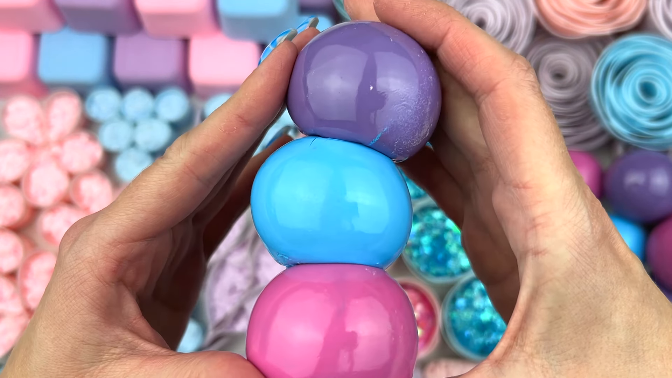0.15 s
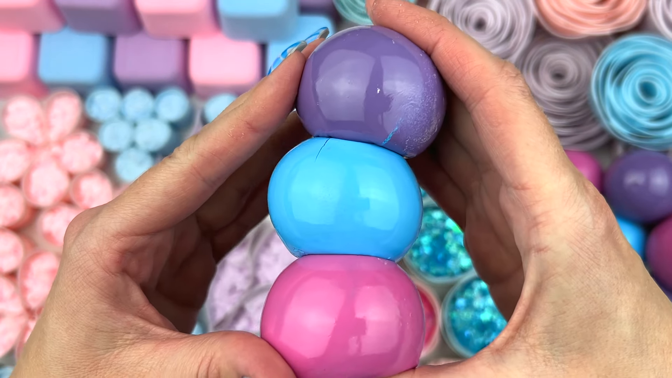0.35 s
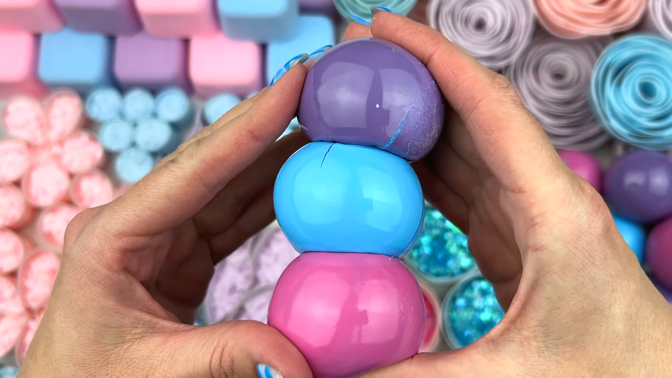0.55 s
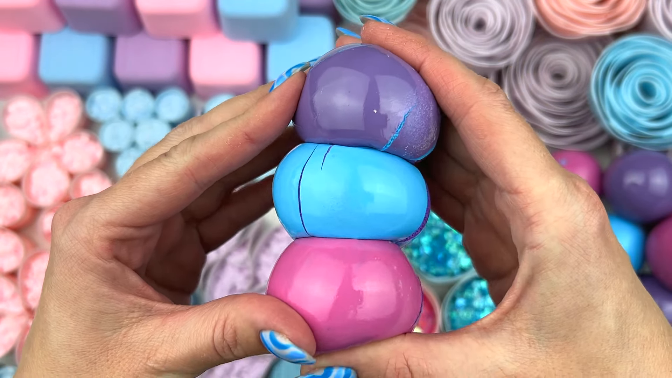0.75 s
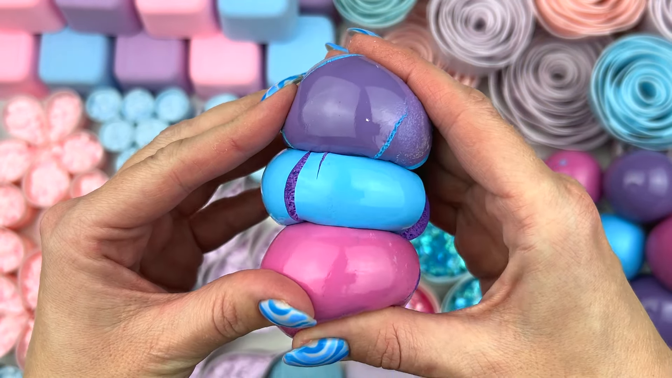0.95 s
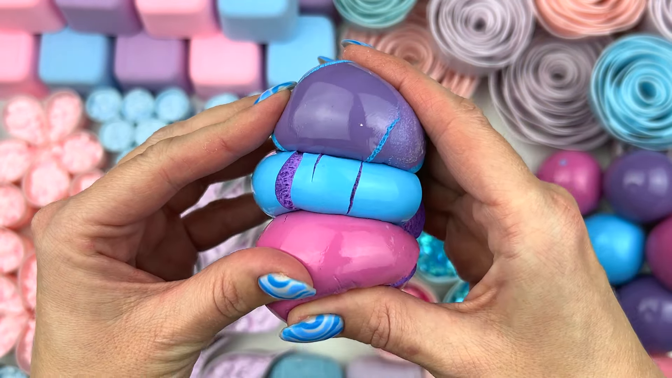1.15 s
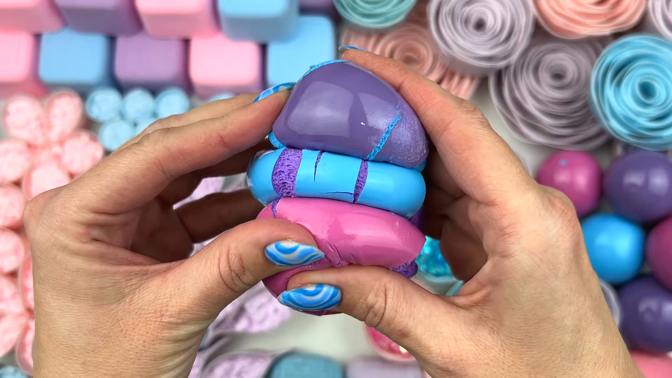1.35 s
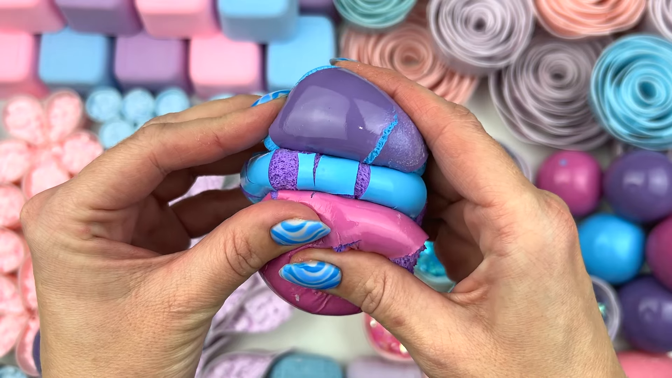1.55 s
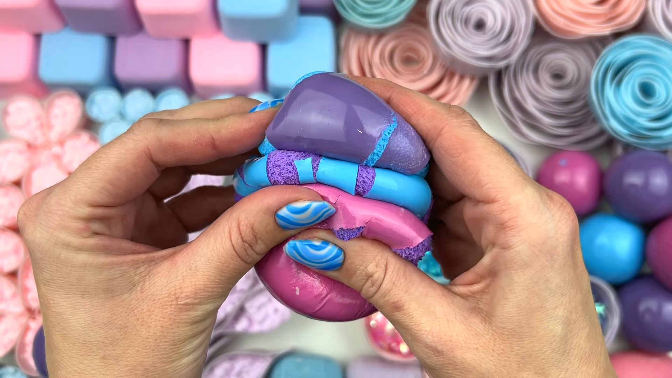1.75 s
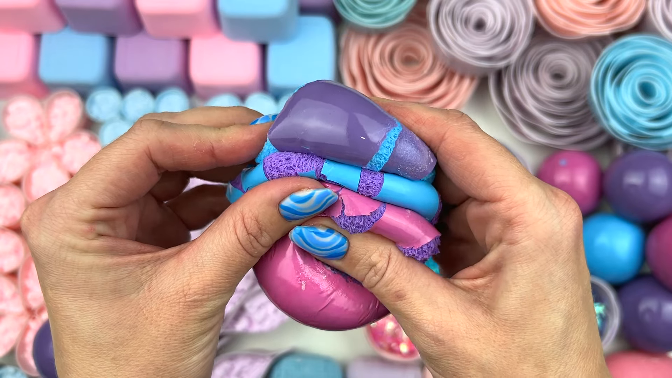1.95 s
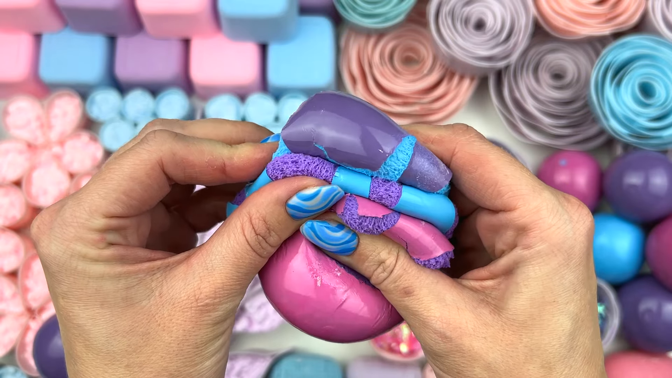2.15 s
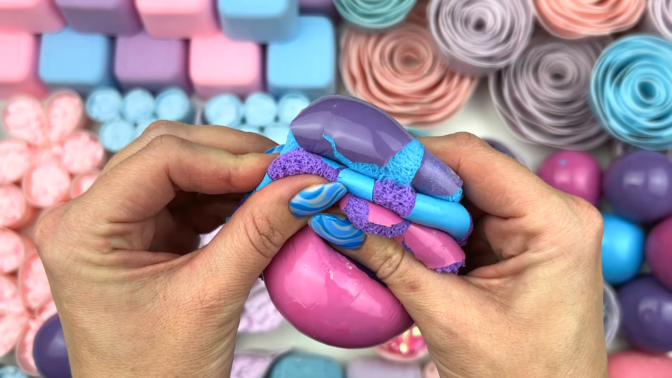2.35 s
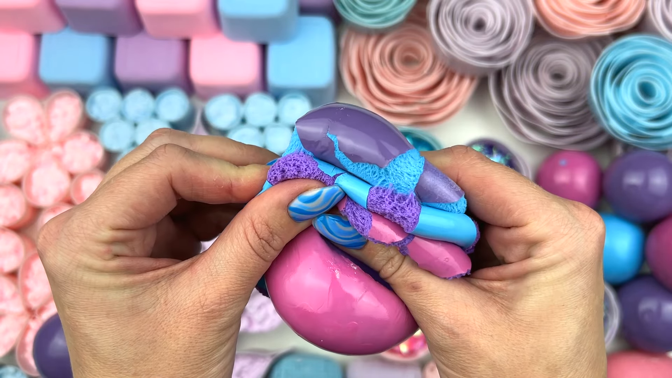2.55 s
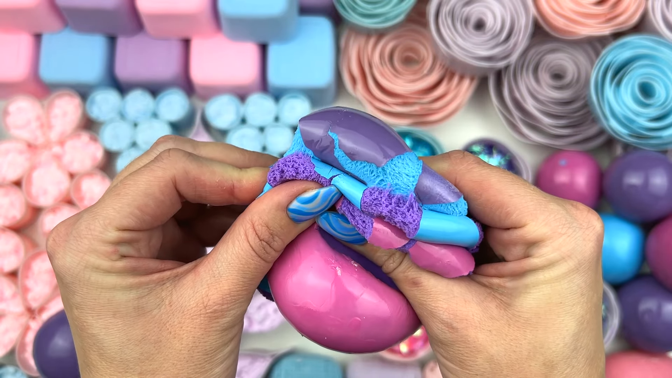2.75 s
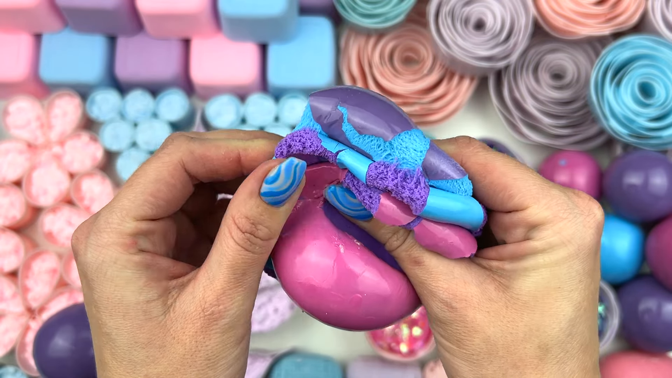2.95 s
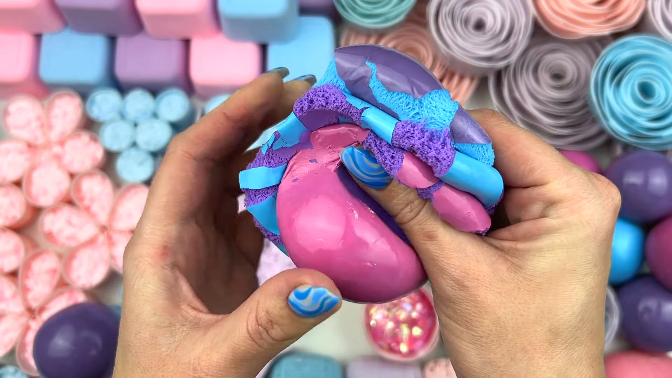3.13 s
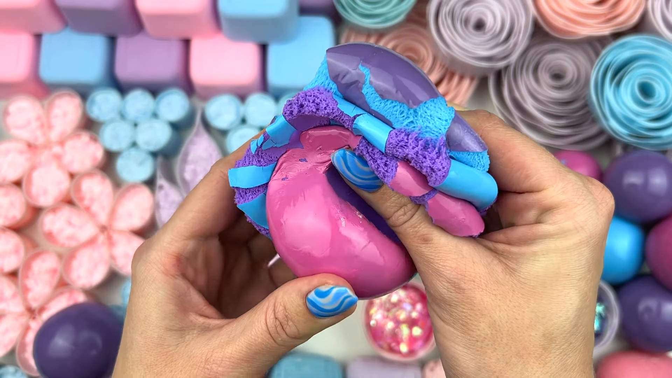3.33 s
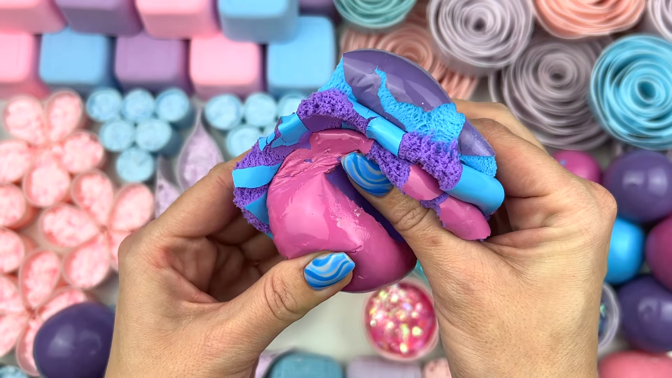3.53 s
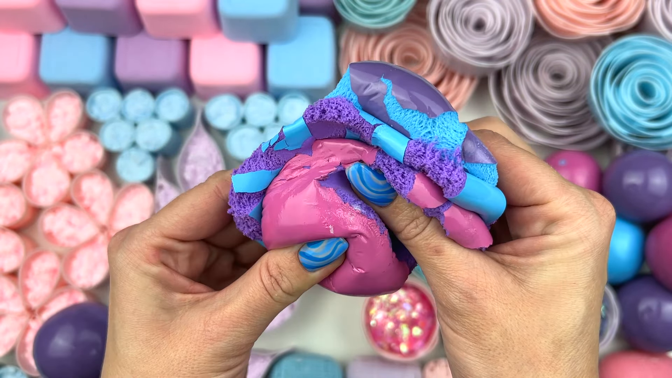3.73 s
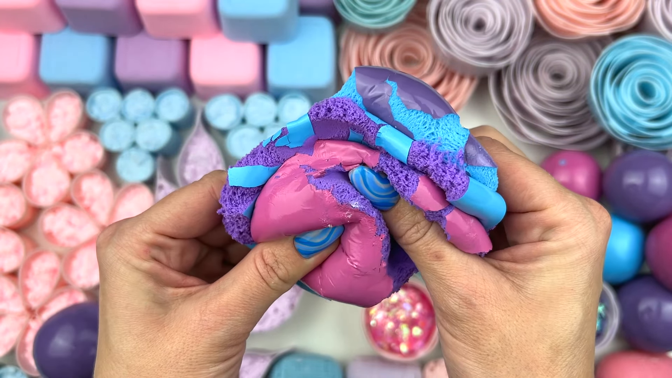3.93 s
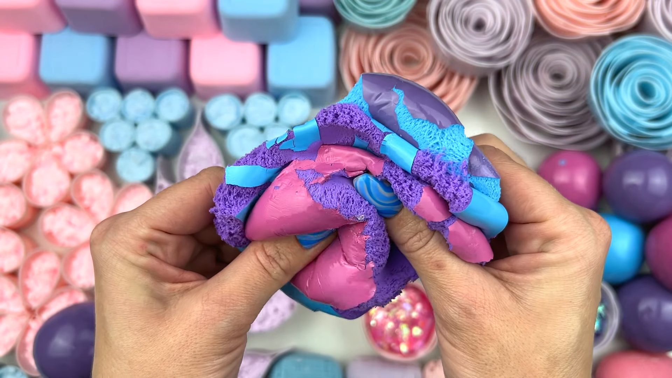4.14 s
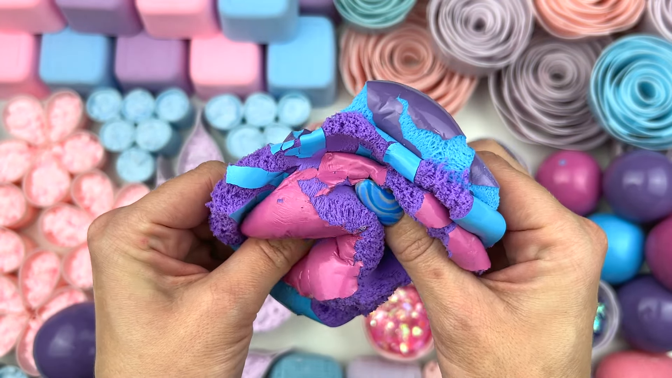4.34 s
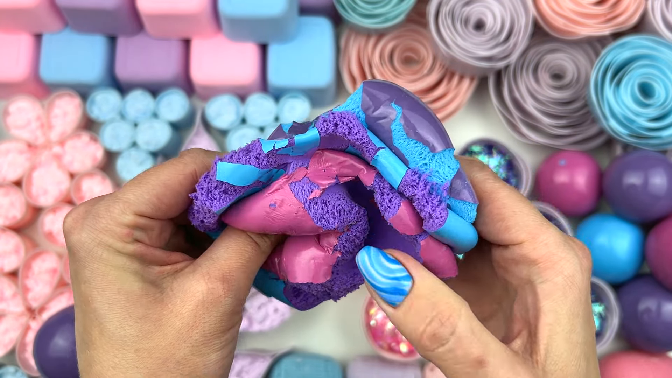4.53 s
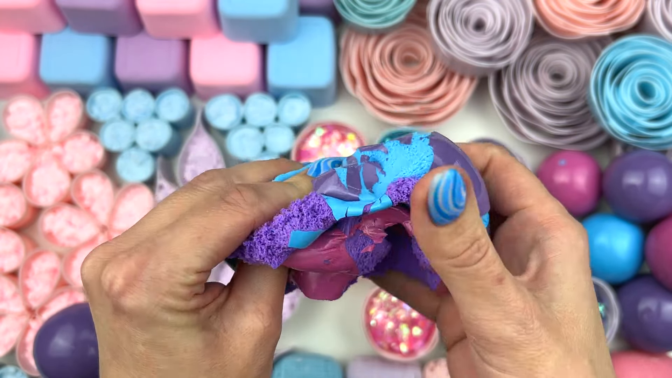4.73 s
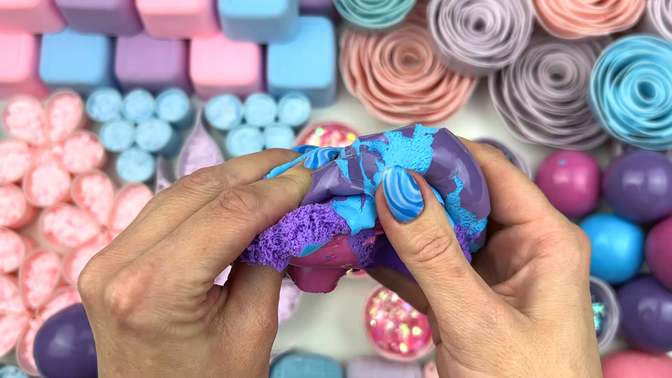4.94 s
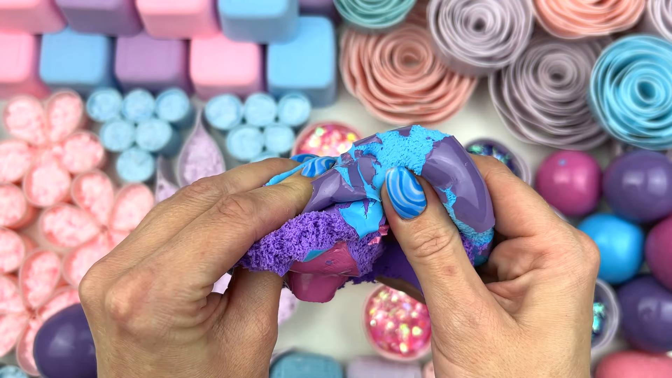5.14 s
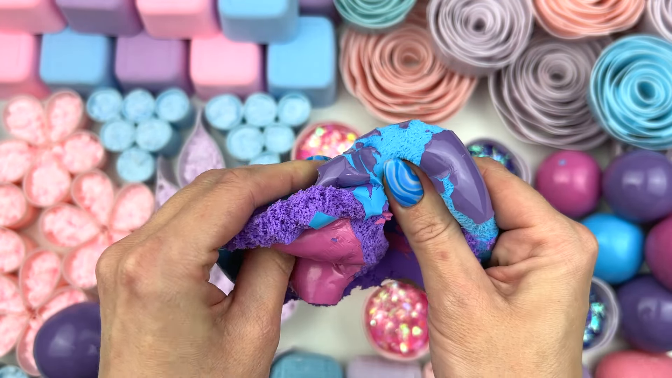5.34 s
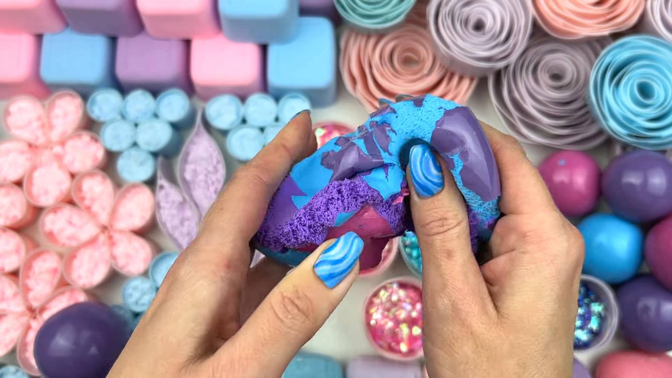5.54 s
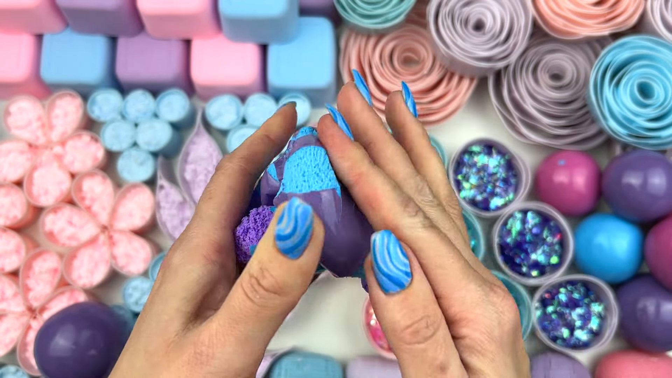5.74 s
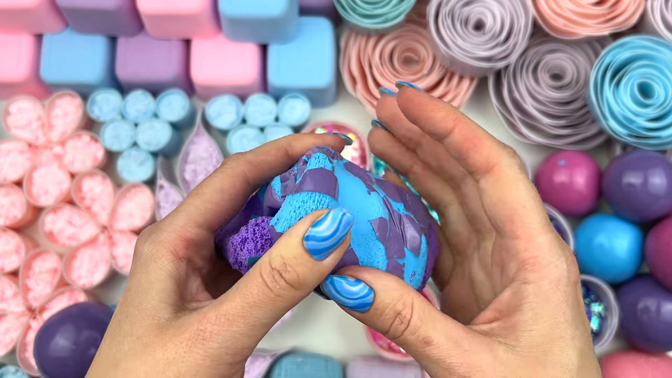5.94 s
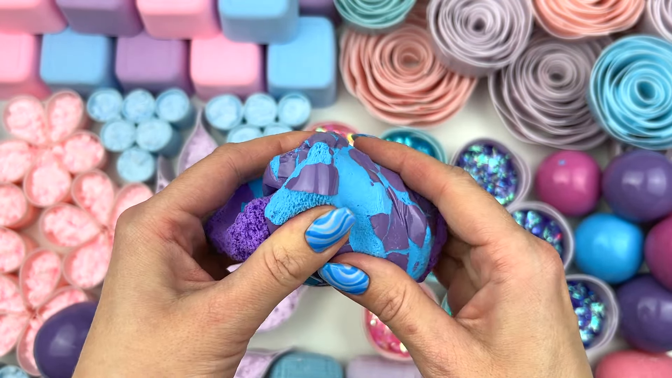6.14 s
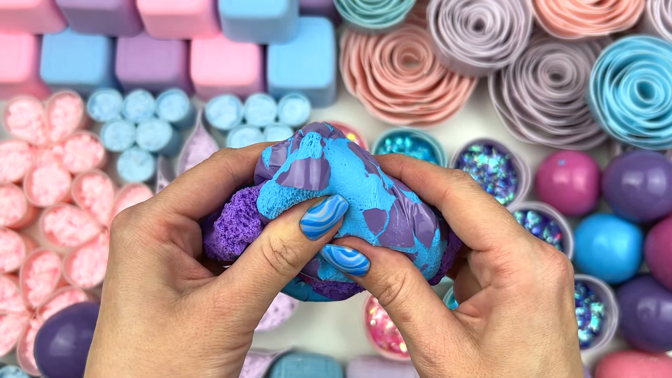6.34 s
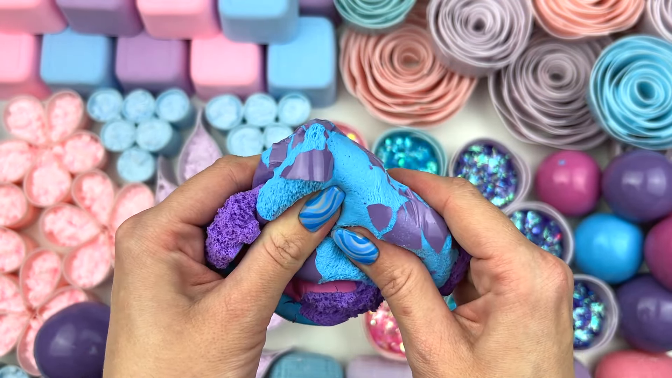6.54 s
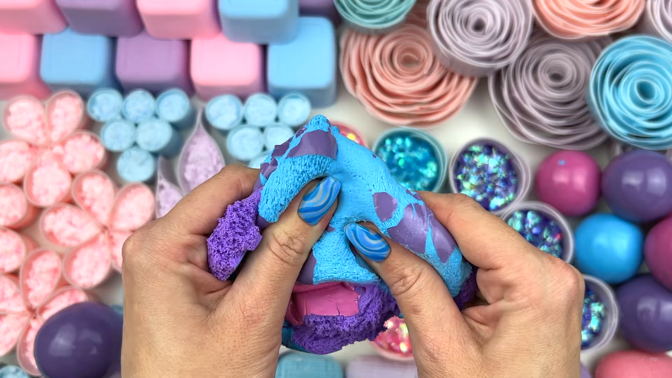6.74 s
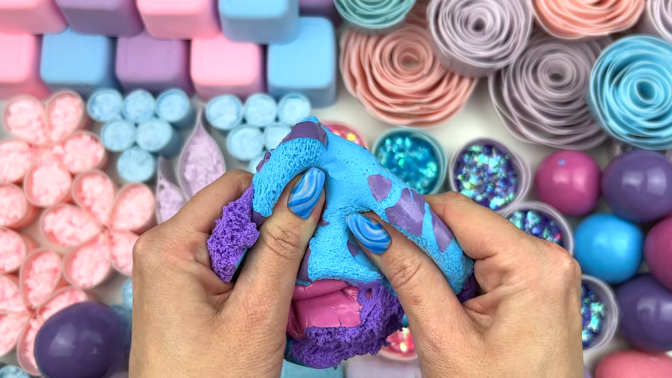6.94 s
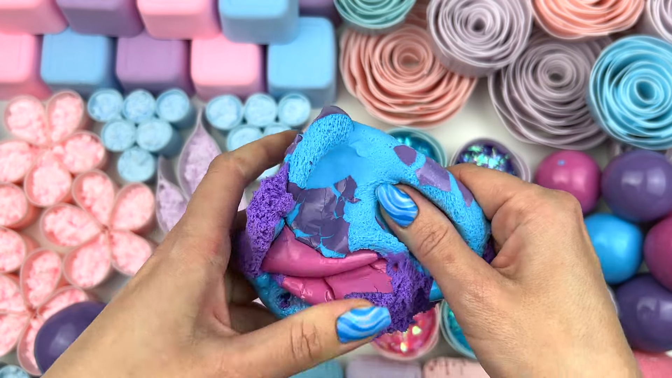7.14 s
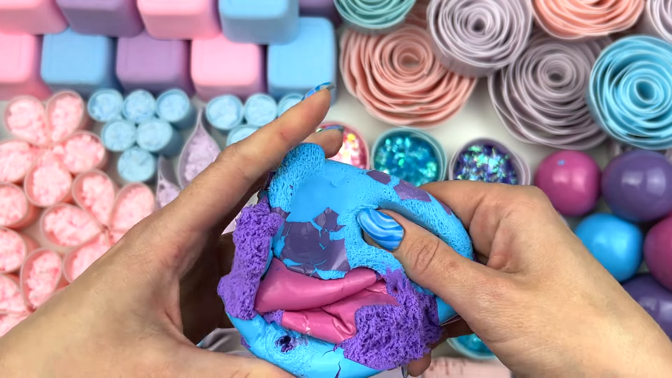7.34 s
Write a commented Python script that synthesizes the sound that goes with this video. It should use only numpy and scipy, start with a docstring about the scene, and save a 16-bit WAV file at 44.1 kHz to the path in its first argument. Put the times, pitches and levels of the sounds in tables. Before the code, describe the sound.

Crisp, irregular crackling of a brittle clay shell breaking under fingers, recorded close in stereo with a short room ring. One long crush comes first, loud and full-bodied with sharp pops, fading to thin dry ticks. Shorter squeezes then come and go, each a little swarm of crunching flakes, some with muted low pushes, with a few strong cracks midway and near the end over nearly silent air.

```python
"""Crushing dry-skinned foam clay

Two hands crush balls of soft foam clay with a dry, lacquered skin, heard up close in a small room.
The skin breaks in sharp snaps, made from short noise bursts that ring like little flakes.
Between them flakes and clay crumble in swarms of tiny ticks, and the soft core gives dull thuds.
The low end of the crackle thins away twice and comes back; a faint rush of air lies underneath.
"""
import sys
import numpy as np
from scipy import signal
from scipy.fft import rfft, irfft, next_fast_len
from scipy.io import wavfile
from scipy.ndimage import uniform_filter1d

SR = 44100
rng = np.random.default_rng(int(sys.argv[2]) if len(sys.argv) > 2 else 0)


def pcm_store(signal):
    """Save signal as 16-bit PCM."""
    levels = np.round(np.clip(np.atleast_2d(signal), -1, 1) * 32767)
    wavfile.write(sys.argv[1], SR, levels.astype(np.int16).T)


N = 329861  # length in samples

# the skin snaps, all relative: t/s, strength level/dB, hollow body level/dB, brittle treble level/dB
SKIN_SNAPS = [(0.2288, -18, 0, 0), (0.2849, -24, -0.5, -2), (0.3009, -4, -1, 7), (0.397, 1.5, -3, -5.5),
              (0.419, -12.5, 1, 1.5), (0.44, 2.5, 9.5, 1), (0.4884, 10.5, 0.5, -8), (0.5497, 12.5, -3.5, 4),
              (0.5532, 16.5, 9, -9.5), (0.6321, 1, -6, -1), (0.6622, 4, -3.5, -2), (0.6835, 7.5, 2.5, 0.5),
              (0.729, 20, -4.5, -4.5), (0.7478, 13, 9.5, 0.5), (0.7896, 19, 7, -2), (0.812, 18, 1, -2.5),
              (0.845, 11.5, 2.5, 1.5), (0.9002, -0.5, -2, -7), (0.9075, 3.5, 9.5, 7), (0.9805, 1, 1.5, -3),
              (1.0695, 5.5, 4.5, 5.5), (1.1187, -5, 5, 3.5), (1.1305, 3.5, -1, 4), (1.1418, 2.5, -9.5, 2.5),
              (1.1531, -5.5, 5, 4.5), (1.1745, -1.5, 2, 9.5), (1.205, 0.5, 1.5, 9.5),
              (1.214, -2, 4.5, -0.5), (1.2746, 8.5, 0.5, 5), (1.2888, 5.5, -7.5, 7), (1.3057, 6.5, 4, -2.5),
              (1.33, 7.5, 9, 2.5), (1.3393, -3, -1, 5), (1.3695, 1, 0, 9), (1.4758, 0.5, 0.5, 0.5),
              (1.4877, 4.5, -0.5, 5), (1.499, 4, 4, 6.5), (1.5254, -0.5, 8, -1.5), (1.5608, 4, 3.5, 3),
              (1.5915, -5, 2.5, 9), (1.6023, 9.5, 0.5, 6), (1.6824, 2, -6, 5), (1.7886, 7, 4.5, 5.5),
              (1.8116, 2, -12.5, 8.5), (1.8429, -4, 4.5, 4), (1.8762, 0.5, 6, 14), (1.8955, 1, -1.5, 7),
              (1.974, -6, 5.5, 5), (2.0927, -9.5, -0.5, -5), (2.1419, 12, -4, -2),
              (2.1831, -10, -9.5, 13.5), (2.2445, -10, 1.5, 9.5), (2.301, -12, -24, 8),
              (2.328, 2.5, -11, 5.5), (2.374, -8.5, -5, -2), (2.3911, 1.5, -11.5, -2.5),
              (2.5378, -0.5, -45, 0), (2.9043, -9.5, -10.5, 7), (2.916, -11, 0, 5), (2.9478, -9.5, 10, 5),
              (3.0003, -9.5, -5, 0.5), (3.031, -10, 2, 9.5), (3.0478, -4, 4, 2.5), (3.0796, -10, 0, -6),
              (3.2181, -6.5, 6.5, -2.5), (3.3678, -2.5, 7, -6), (3.3973, -2, 9, -10.5),
              (3.4622, -5, 7.5, -4.5), (3.51, -2.5, 9.5, 7), (3.5456, -9, 10, 1.5), (3.6883, 0, 3.5, -4.5),
              (3.734, 15, 11.5, -2), (3.86, -6, -2, 6), (3.8733, 0, 0, -1.5), (3.8849, -1.5, 2, -2.5),
              (3.9582, -8.5, -1, 4.5), (3.9808, -9.5, 1, 4.5), (4.0171, -3.5, 5, 8.5),
              (4.0771, -13.5, 0, 5.5), (4.1268, 12, -5.5, -9), (4.1512, 6, 4, -7.5), (4.2755, -7, -7.5, -6),
              (4.301, -11, -8, -5), (4.364, 3, -9, -8.5), (4.4627, -9, -7, -5), (4.4808, -6.5, -3.5, -6.5),
              (4.6115, -8.5, 4, -8), (4.8354, -6.5, -3, 3), (4.8462, -8, -2.5, 4), (4.8687, -11, -7.5, 3),
              (4.9032, -6.5, 1, -10.5), (4.921, -11.5, -13, 0.5), (4.9486, -9, -20, 8), (4.9856, 0, 4, 4),
              (5.0543, 6, 9.5, 2.5), (5.1225, -9, 4.5, 6.5), (5.1629, 5.5, -6.5, -11),
              (5.301, -6, -12.5, -2.5), (5.3348, 5, 7.5, -13), (5.3398, 17.5, -7, -10),
              (5.377, 2, 15.5, -5), (5.512, -4.5, 6.5, -7.5), (5.5651, -11.5, 11, -9.5),
              (5.6698, -17.5, 0, -22), (5.8658, -0.5, 5, -43), (5.9223, -10.5, -16, -8),
              (5.9852, -6, -2, 3.5), (6.0234, -15.5, 0, -11.5), (6.0394, 2, 7.5, 1.5),
              (6.1094, 5, -5.5, 4.5), (6.1439, -4.5, -9, 3), (6.1686, -7.5, -1, 1), (6.1987, 0, 6.5, 3.5),
              (6.2232, -9.5, 2, 18.5), (6.2473, 3, 3.5, -2.5), (6.3557, -3.5, -12, 2.5),
              (6.4559, -3.5, -12, -2.5), (6.505, -3.5, 3.5, 3.5), (6.5757, -8.5, -17.5, 9.5),
              (6.6165, 5, -10.5, -6.5), (6.634, -4.5, -3, 4.5), (6.6769, -1.5, -10, -4.5),
              (6.7344, -2, -14, -11.5), (6.81, -8.5, -25, 2.5), (6.9018, -7, -11.5, -1.5),
              (6.9252, -7, -13, 6), (7.0452, 8.5, -11, -10.5), (7.0529, 10.5, 0, -3.5),
              (7.0589, -1.5, 3, 5), (7.138, 0.5, -16, -22), (7.1653, -5, -1.5, -15.5),
              (7.3216, -12, 8.5, -3), (7.3446, -11.5, 2.5, 0.5), (7.4093, 4.5, -16, -4.5)]
# how hard the flakes grind in the first long crush: t/s, relative level/dB
FIRST_CRUSH = [(0.2, -81.5), (0.31, -59.5), (0.39, -69.5), (0.47, -49), (0.66, -49), (0.8, -35.5),
               (1.06, -47.5), (1.3, -38), (1.44, -42.5), (1.6, -38.5), (1.68, -48.5), (1.88, -41.5),
               (2.04, -54.5), (2.16, -50.5), (2.55, -57), (2.7, -67)]
# the separate squeezes that follow: start t/s, hold t/s, relative level/dB
SQUEEZES = [(2.856, 0.21, -57.5), (3.349, 0.03, -54), (3.481, 0.16, -61), (3.749, 0.02, -44),
            (3.859, 0.3, -54), (4.39, 0.1, -50), (4.65, 0.08, -52.5), (4.839, 0.34, -52),
            (5.333, 0.05, -47), (5.513, 0.09, -53), (5.81, 0.16, -56), (6.069, 0.22, -48.5),
            (6.4, 0.1, -53), (6.56, 0.21, -46.5), (6.99, 0.1, -47), (7.34, 0.11, -54)]
# how fast a squeeze swells and dies away, and the grinding while the clay is merely held
GRIP_DB_PER_S, RELAX_DB_PER_S, HOLDING_DB = 230, 130, -67
# samples of tearing before a break lets go
LEAD = 128
# colour of a breaking flake: f/Hz, level/dB
SKIN_COLOUR = [(30, -33), (100, -19), (250, -9), (500, -7.5), (720, -4.5), (1000, 3.5), (1400, 1),
               (2100, 4), (2950, -0.5), (3800, 1.5), (5400, -4.5), (8500, -3.5), (10000, -8), (12500, -10),
               (15500, -13)]
# short ring of the hollow shell: f/Hz, width f/Hz, level/dB
SHELL_RINGS = [(475, 40, -1), (977, 56, -7.5), (1847, 17, -1.5), (2080, 900, -14.5)]
# colour of the tiny ticks against full snaps: f/Hz, level/dB
TICK_COLOUR = [(60, 6), (400, 1), (1000, -4), (2200, 1.5), (4000, 1.5), (7500, 4), (15000, 5.5)]
# the soft core gives way under the thumbs: t/s, relative peak level/dB
CORE_THUDS = [(3.061, -61), (3.363, -60.5), (5.377, -52), (5.545, -55), (5.876, -55.5), (7.073, -44.5),
              (7.409, -60)]
# colour of those thuds: f/Hz, relative level/dB
CORE_COLOUR = [(30, -19), (70, 8.5), (250, 7), (500, 14), (900, 1), (1600, -4), (4000, -70)]
# how long the room rings: f/Hz, time to fall 60 dB t/s
ROOM_DECAY = [(150, 0.19), (1000, 0.27), (4000, 0.23), (14000, 0.39)]
# how strongly the room answers: f/Hz, level/dB
ROOM_COLOUR = [(150, -5.5), (1000, -8.5), (2200, -8), (5000, -9), (14000, -22)]
# long resonances of the things on the table: f/Hz, width f/Hz, level/dB
TABLE_RINGS = [(234.8, 16, 9), (482, 8.5, 1.5), (726, 11, 2), (982, 18, 2), (1316, 110, -0.5),
               (1374, 38, -3), (1710, 41, 2), (2140, 180, -10), (3630, 57, -9)]
# how unlike the two channels are, as each one's own part over the shared part: f/Hz, basic ratio
STEREO_WIDTH = [(150, 0.17), (500, 0.89), (1500, 2), (6000, 1)]
# phase by which the left microphone port leads the right: f/Hz, phase/rad
PORT_PHASE = [(100, 0), (900, 0), (1300, 1.9), (1700, .1), (3500, 1.1), (5500, -.8), (7000, -.1),
              (10000, -3.1), (16000, -9.3)]
# left minus right: f/Hz, level/dB
LEFT_LEAN = [(100, 2.5), (850, 2.5), (1250, 5.5), (1700, -2), (2400, 2), (4600, 5), (7500, 0.5),
             (15000, -0.5)]
# the crackle has almost nothing below this moving edge: t/s, f/Hz
MOVING_LOW_EDGE = [(1.62, 40), (2.05, 620), (2.39, 820), (2.5, 1750), (2.75, 3300), (3.15, 3900),
                   (3.718, 3800), (3.722, 20), (4.2, 740), (4.57, 950), (4.75, 2550), (4.88, 1600),
                   (5.02, 2400), (5.29, 2650), (5.6, 1900), (5.87, 2500), (6.05, 1200), (6.28, 480),
                   (6.95, 20)]
# narrow bands that still ring under the edge: start t/s, end t/s, f/Hz, width f/Hz, level/dB
RINGING_BANDS = [(3.45, 3.606, 2580, 150, -2), (5.01, 5.714, 1700, 90, -1), (4.98, 5.6, 1890, 90, -7)]
# colour of the still air: f/Hz, relative level/dB
AIR_COLOUR = [(25, -13.5), (70, 0.5), (200, -5), (1000, -7.5), (1500, -17.5), (3000, -18), (8000, -23.5),
              (15000, -40.5)]
# nothing is heard above this frequency
TOP_HZ = 16000


def snaps(rows, level_db, flake_hz, flake_db, flake_q, size=1024):
    """Skin breaks, each with its own share of body and treble, and a flake ringing at its own pitch."""
    s, db, body_db, treble_db = np.transpose(rows)
    hz = np.fft.rfftfreq(size, 1 / SR)
    body = body_db[:, None] * along([(900, 1), (4000, 0)], hz)
    treble = treble_db[:, None] * along([(4000, 0), (12000, 1)], hz)
    # a bigger break frees a bigger, lower flake
    pitch = flake_hz * np.exp(-0.01 * db + 0.23 * rng.standard_normal(len(s)))[:, None]
    flake_ring = resonances([(pitch, pitch / flake_q, flake_db)], hz)
    colour = causal(amp(level_db + db[:, None] + body + treble)) * flake_ring
    breaks = fractures(len(s), run_s=0.00042, after_s=0.0033, after_db=-8.5,
                       before_s=0.0011, before_db=-11.5, apart=0.42)
    return placed(s, irfft(breaks * colour[:, None]))


def fractures(count, run_s, after_s, after_db, before_s, before_db, apart, size=1024):
    """Stereo spectra of single breaks: the skin starts to tear, lets go, and the loose edge flutters."""
    t = (np.arange(size) - LEAD) / SR
    run = run_s * np.exp(0.35 * rng.standard_normal((count, 1, 1)))
    tearing = amp(before_db) * np.exp(-np.abs(t) / before_s)
    flutter = amp(after_db) * np.exp(-np.abs(t) / after_s)
    letting_go = np.exp(-np.abs(t) / run) + flutter
    z = rfft(rng.standard_normal((count, 3, size)) * np.where(t < 0, tearing, letting_go))
    # long waves reach both ports nearly alike: one shared noise, plus a little of each port's own
    z = z[:, :1] + apart * along(STEREO_WIDTH, np.fft.rfftfreq(size, 1 / SR)) * z[:, 1:]
    # each break is broadly white but keeps its own fine peaks and notches
    power = np.mean(np.abs(z) ** 2, 1, keepdims=True)
    return z / np.sqrt(np.abs(uniform_filter1d(power, size=36)) + 1e-12)


def effort():
    """How hard the flakes grind, in dB: one long crush, then squeezes that each grip, hold and relax."""
    t = np.arange(N) / SR
    db = np.where(t < FIRST_CRUSH[-1][0], curve(FIRST_CRUSH, t), HOLDING_DB)
    for start, hold, level in SQUEEZES:
        slack = np.maximum(GRIP_DB_PER_S * (start - t), RELAX_DB_PER_S * (t - start - hold))
        db = np.maximum(db, level - np.maximum(slack, 0))
    return db


def chips(effort_db, level_db, grows, crowding, spread_db, body_db, treble_db,
          colour_spread_db, count=110):
    """Lesser snaps at random, as rows like SKIN_SNAPS: more effort makes them denser and stronger."""
    # the running total of effort decides where the chips fall
    due = np.cumsum(np.maximum(effort_db - HOLDING_DB, 0) ** crowding + 1e-9)
    at = np.searchsorted(due, (np.arange(count) + rng.random(count)) / count * due[-1])
    size, body, treble = np.clip(rng.standard_normal((count, 3)), -2, 2).T
    extra_effort = effort_db[at] - effort_db[at].mean()
    strength = level_db + grows * extra_effort + spread_db * size
    body = body_db + colour_spread_db * body
    treble = treble_db + colour_spread_db * treble
    return np.transpose([at / SR, strength, body, treble])


def crumbs(effort_db, level_db, spread_db, dust_db, count=1600):
    """Ticks of uneven size over a dust of finer ones (spiky noise), all following the grinding."""
    s = (np.arange(count) + rng.uniform(-1.3, 1.6, count)) * N / SR / count
    sizes = amp(spread_db * np.minimum(rng.standard_normal(count), 2))
    # neighbouring ticks share the strain: a big one leaves less for the rest
    sizes = sizes / np.sqrt(np.abs(uniform_filter1d(sizes ** 2, size=20)) + 1e-12)
    ticks = irfft(fractures(count, run_s=0.00025, after_s=0.0015, after_db=-19,
                            before_s=0.0007, before_db=-14, apart=0.25))
    swarm = unit(placed(s, ticks * sizes[:, None, None]))
    # cubing noise makes it spiky; one part is shared, one belongs to each channel
    dust = unit(rng.standard_normal(N) ** 3 + 0.4 * rng.standard_normal((2, N)) ** 3)
    grinding = amp(level_db + effort_db)
    return filtered(grinding * (swarm + amp(dust_db) * dust), lambda hz: amp(along(TICK_COLOUR, hz)))


def shell(x, size=8192):
    """The skin's colour and the short ring of the hollow shell, as one filter."""
    hz = np.fft.rfftfreq(size, 1 / SR)
    response = causal(amp(along(SKIN_COLOUR, hz))) * resonances(SHELL_RINGS, hz)
    return signal.fftconvolve(x, irfft(response)[None], axes=1)[:, :N]


def thuds(level_db, rise_s, fall_s):
    """Dull pushes from the soft core: low noise that swells and fades around each thud."""
    t = np.arange(N) / SR
    push = sum(amp(db) * np.exp(-np.maximum((s - t) / rise_s, (t - s) / fall_s))
               for s, db in CORE_THUDS)
    noise = unit(filtered(rng.standard_normal(N), lambda hz: amp(along(CORE_COLOUR, hz))))
    return amp(level_db) * push * noise


def room(x, table_s, table_db, count=4):
    """A table reflection, then four fading-noise tails that take turns every 1/16 s."""
    echo = amp(table_db) * np.pad(x, ((0, 0), (int(table_s * SR), 0)))[:, :N]
    # each 1/16 s of sound feeds the next tail in turn
    zone = np.arange(N) // (SR // 16) % count
    wet = 0
    for k in range(count):
        hz, t, z = signal.stft(rng.standard_normal((3, SR // 2)), SR, nperseg=256)
        fade = amp(-60 * t / along(ROOM_DECAY, hz)[:, None])
        z = z * fade * (1 - np.exp(-t / 0.00058))
        width = along(STEREO_WIDTH, hz)[:, None]
        tail = signal.istft((z[0] + width * z[1:]) / np.hypot(1, width), SR, nperseg=256)[1]
        tail = tail / np.linalg.norm(tail[0])
        wet = wet + signal.fftconvolve(x * (zone == k), tail, axes=1)[:, :N]
    return echo + filtered(wet, lambda hz: amp(along(ROOM_COLOUR, hz)) * resonances(TABLE_RINGS, hz))


def thinned(x, depth_db, steep, hollow_db, burst_db, burst_hz):
    """Sound under the moving edge sinks away, but for narrow bands; loud snaps push the edge down."""
    hz, t, z = signal.stft(x, SR, nperseg=512)
    f = hz[:, None]
    edge = curve(MOVING_LOW_EDGE, t)
    loudness = np.sum(np.abs(z) ** 2 * (f > edge), axis=(0, 1))
    resistance = 1 + (amp(burst_db) ** 2 / (loudness + 1e-12)) ** 2
    edge = edge - np.maximum(edge - burst_hz, 0) / resistance
    place = edge / (f + 20)
    above = 1 / (1 + place ** steep)
    # what is left under the edge: the gap is made deeper just below it
    left_db = along([(60, 4.5), (200, 9), (1000, 4), (1600, -9), (2600, -9), (4000, 0)], hz)[:, None]
    under = amp(depth_db + left_db + hollow_db / np.maximum(place, 1) ** 2)
    for start, end, centre, width, db in RINGING_BANDS:
        band = np.exp(-((f - centre) / width) ** 2)
        under = under + amp(db) * band * ((t > start) & (t < end))
    return signal.istft(z * (above + (1 - above) * under), SR, nperseg=512)[1][:, :N]


def air(level_db, sunk_db):
    """The faint rush of the room: coloured noise, fainter while the low end is thin."""
    noise = rng.standard_normal((3, N))
    edge = curve(MOVING_LOW_EDGE, np.arange(N) / SR)
    sunk = sunk_db * along([(100, 0.26), (500, 1)], edge)
    rush = filtered(noise[0] + 0.5 * noise[1:], lambda hz: amp(along(AIR_COLOUR, hz)))
    return amp(level_db + sunk) * unit(rush)


def placed(times, sounds):
    """Sum short stereo sounds, each breaking at its time."""
    first = np.maximum(times * SR - LEAD, 0).astype(int)
    index = first[:, None] + np.arange(sounds.shape[-1])
    return np.array([np.bincount(index.ravel(), sounds[:, c].ravel(), N)[:N] for c in range(2)])


def resonances(modes, hz):
    """A flat response with (Hz, width Hz, dB) peaks on it."""
    return 1 + sum(amp(db) * 1j * hz * w / (c * c - hz * hz + 1j * hz * w) for c, w, db in modes)


def causal(gain):
    """The minimum-phase response with this gain: nothing sounds before the blow."""
    cep = irfft(np.log(np.maximum(gain, 1e-6)))
    half = cep.shape[-1] // 2
    # fold the backward half of the cepstrum onto the forward half
    cep[..., 1:half] *= 2
    cep[..., half + 1:] = 0
    return np.exp(rfft(cep))


def filtered(x, response):
    """x times a response that depends on frequency."""
    m = next_fast_len(N + SR // 2)
    return irfft(rfft(x, m) * response(np.fft.rfftfreq(m, 1 / SR)), m)[..., :N]


def amp(db):
    """Decibels to gain."""
    return 10 ** (np.asarray(db) / 20)


def unit(x):
    """Scale to an average (rms) strength of 1."""
    return x / np.sqrt(np.mean(x ** 2) + 1e-20)


def along(points, hz):
    """(Hz, value) points read on a logarithmic frequency axis."""
    f, v = np.transpose(points)
    return np.interp(np.log(hz + 1), np.log(f + 1), v)


def curve(rows, at):
    """(position, value) rows joined by straight lines."""
    return np.interp(at, *np.transpose(rows))


def scene():
    """The clay in its room, as two microphone ports hear it."""
    effort_db = effort()
    lesser = chips(effort_db, level_db=-13.5, grows=0.43, crowding=0.4, spread_db=2.5,
                   body_db=-2, treble_db=2, colour_spread_db=3.5)
    breaking = snaps(np.vstack([SKIN_SNAPS, lesser]), level_db=-1, flake_hz=2280, flake_db=-4, flake_q=7)
    crumbling = crumbs(effort_db, level_db=3, spread_db=4.5, dust_db=-14)
    clay = shell(breaking + crumbling)
    clay = clay + room(clay, table_s=0.0098, table_db=-18)
    # each port takes half of the level and phase difference
    side = np.array([[0.5], [-0.5]])
    heard = filtered(clay, lambda hz: amp(side * along(LEFT_LEAN, hz))
                     * np.exp(1j * side * curve(PORT_PHASE, hz)))
    crackle = thinned(heard, depth_db=-22.5, steep=33, hollow_db=-13, burst_db=-18.5, burst_hz=1160)
    soft = thuds(level_db=2.5, rise_s=0.011, fall_s=0.026) + air(level_db=-65.5, sunk_db=-8.5)
    return crackle + soft


def record(dry):
    """The loudest snaps overload the input and are rounded off; nothing passes the band limit."""
    clipped = dry / (1 + np.abs(dry) ** 6) ** (1 / 6)
    return filtered(clipped, lambda hz: hz < TOP_HZ)


dry = scene()
out = record(dry)
pcm_store(out)
```